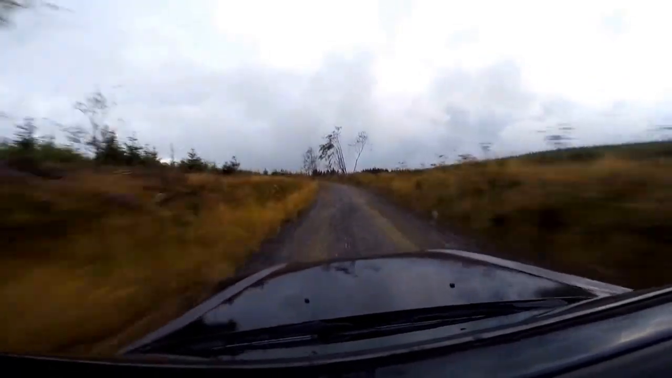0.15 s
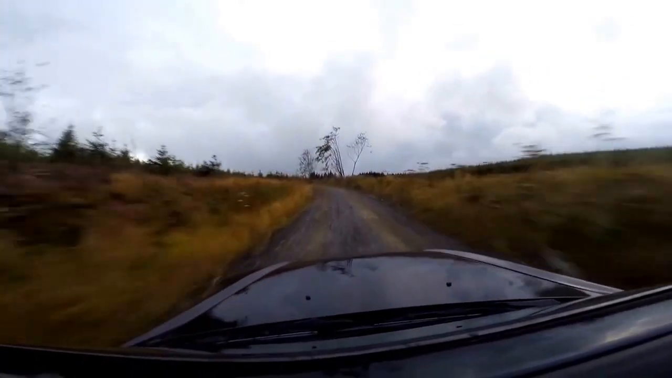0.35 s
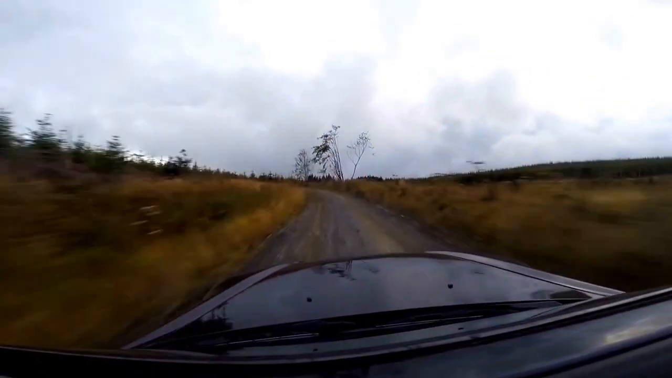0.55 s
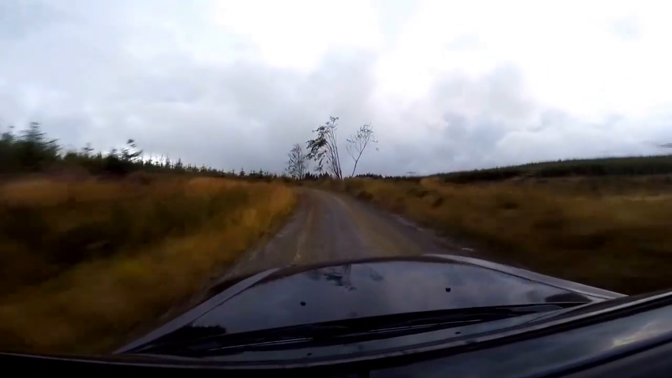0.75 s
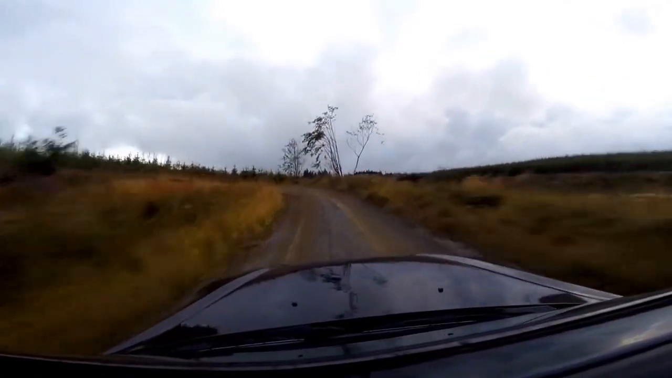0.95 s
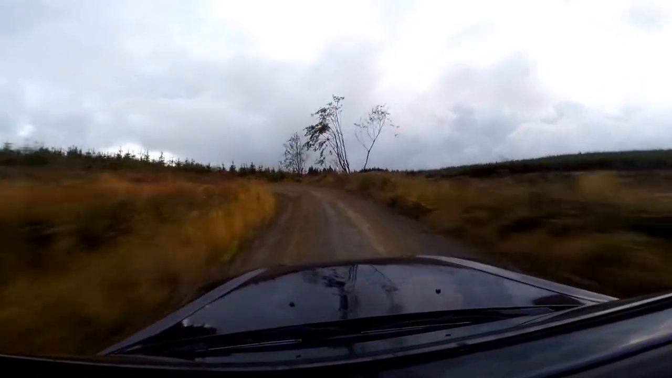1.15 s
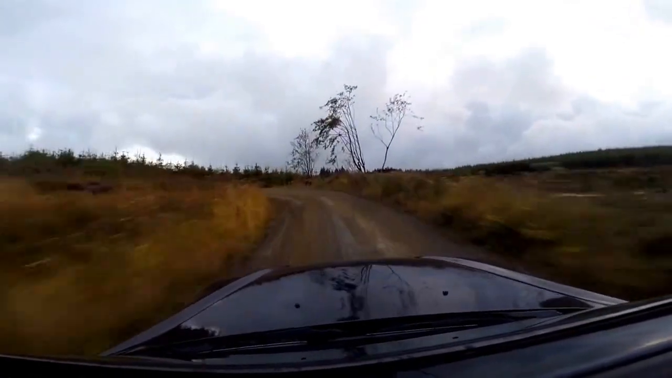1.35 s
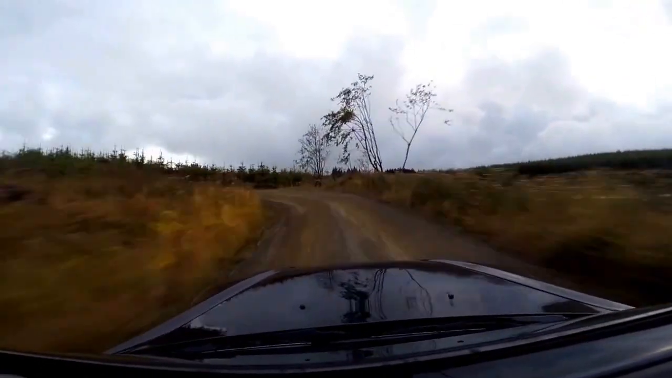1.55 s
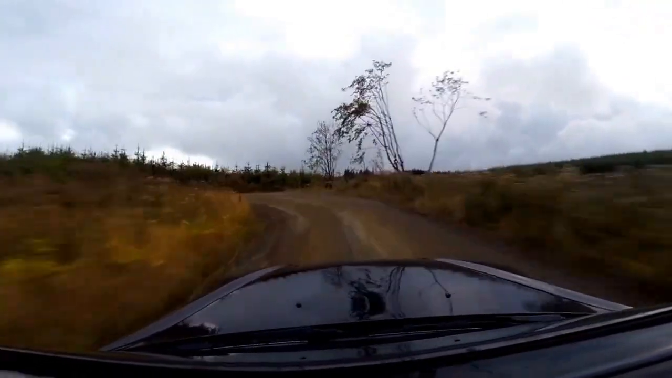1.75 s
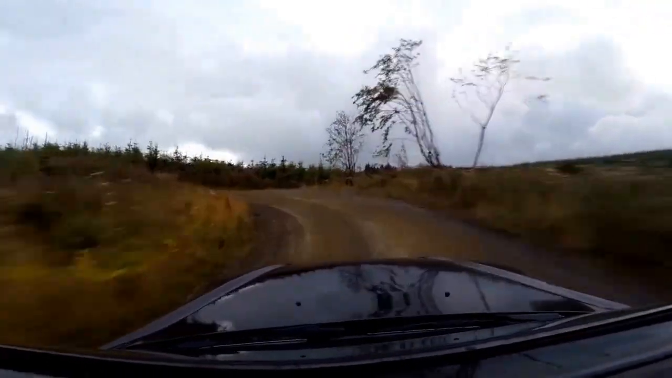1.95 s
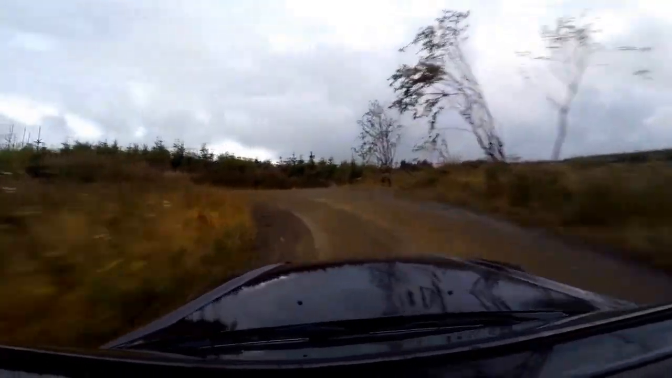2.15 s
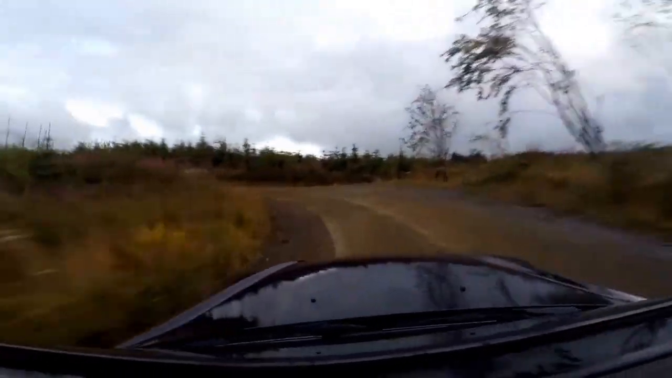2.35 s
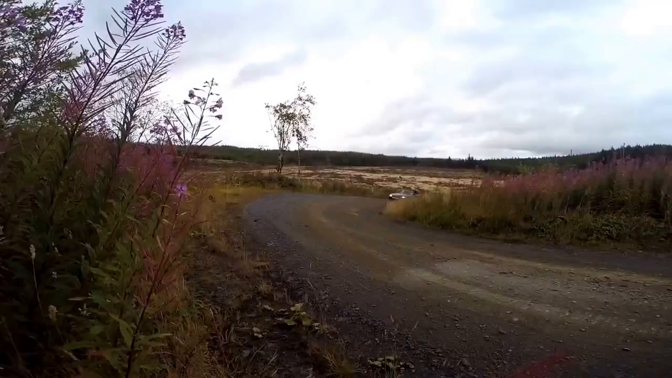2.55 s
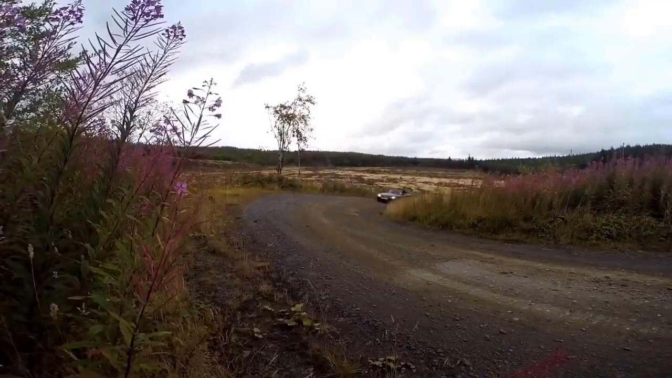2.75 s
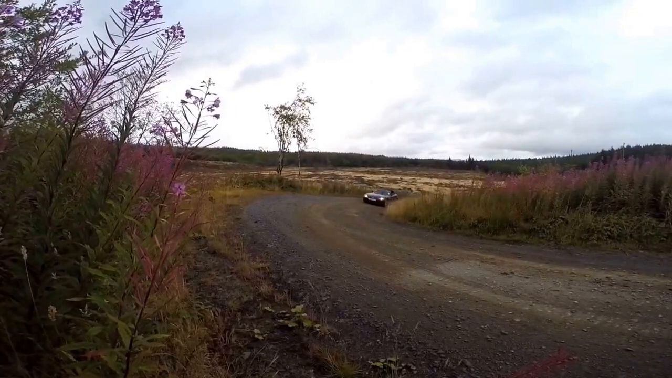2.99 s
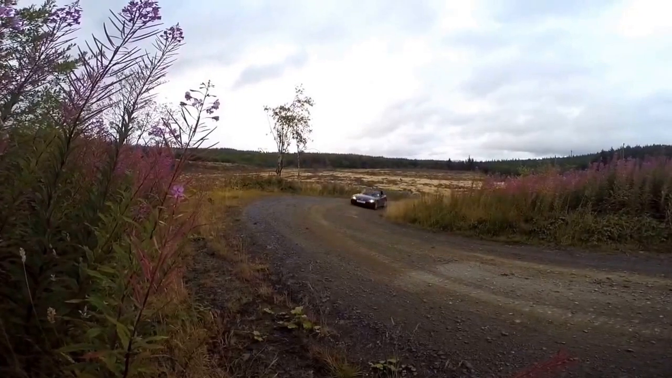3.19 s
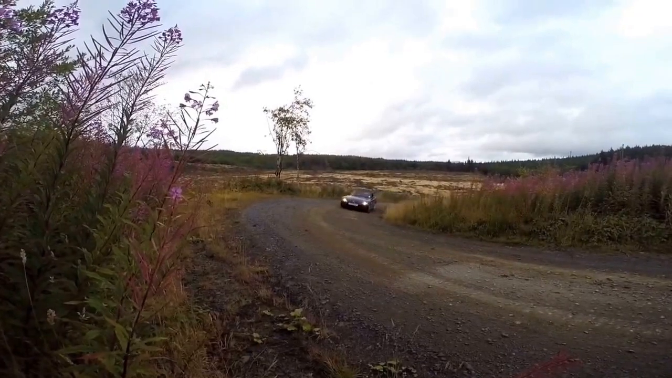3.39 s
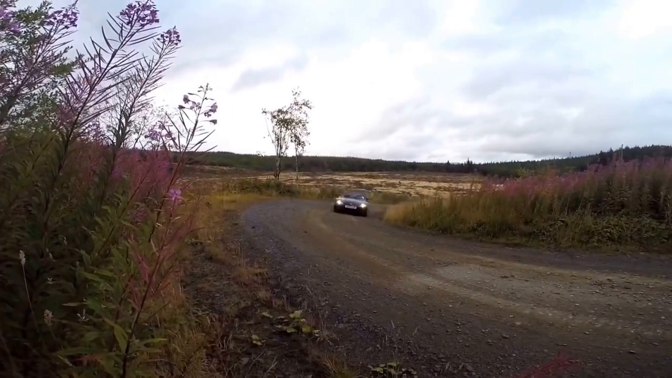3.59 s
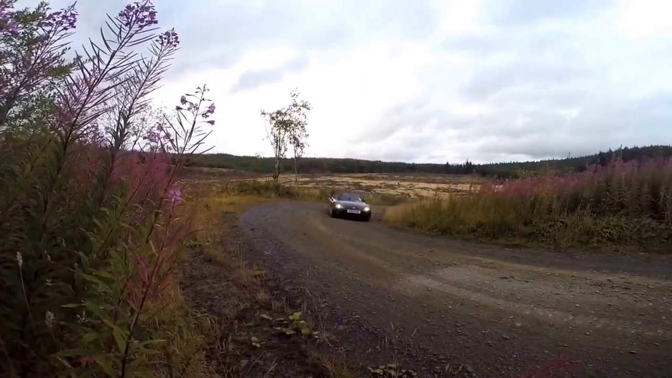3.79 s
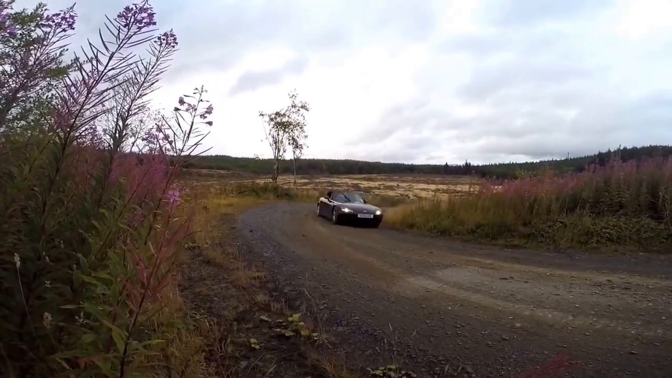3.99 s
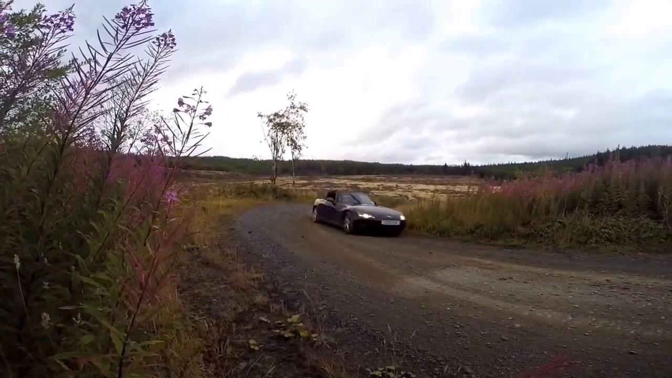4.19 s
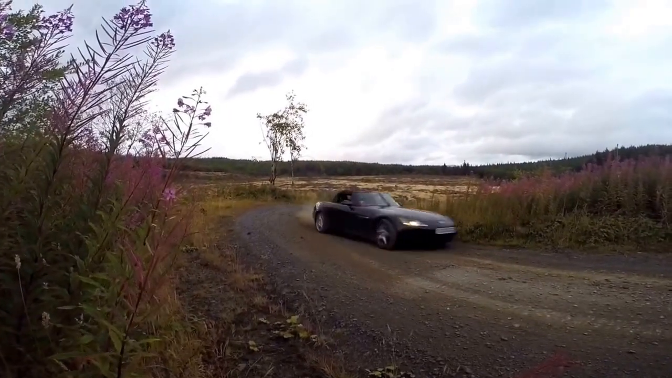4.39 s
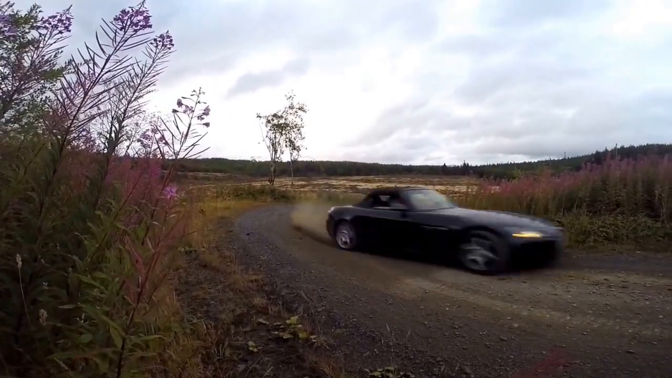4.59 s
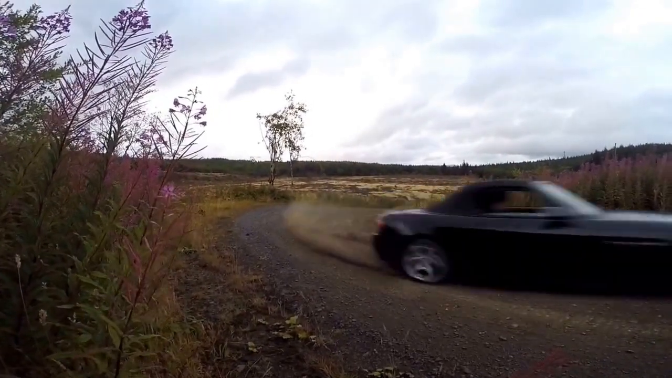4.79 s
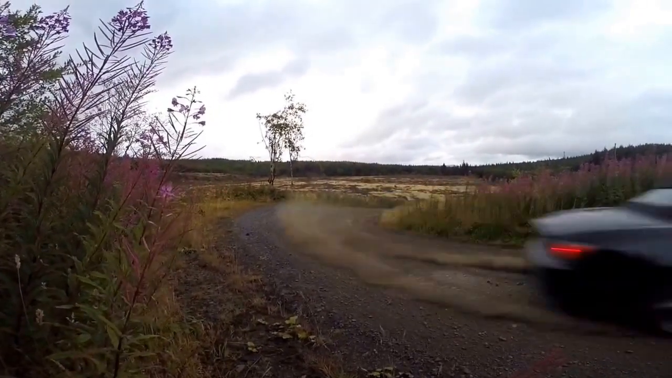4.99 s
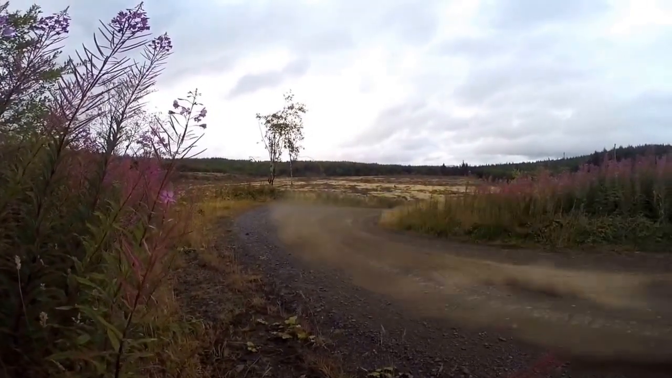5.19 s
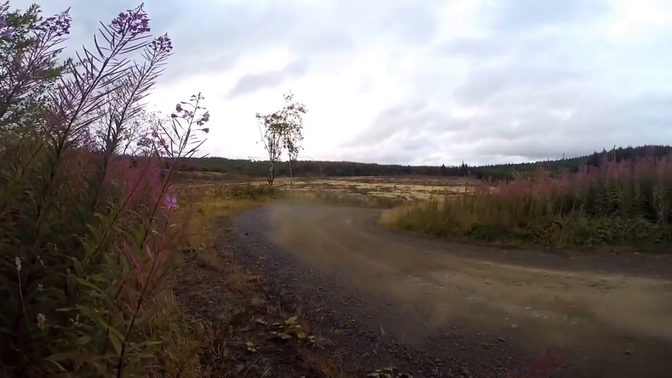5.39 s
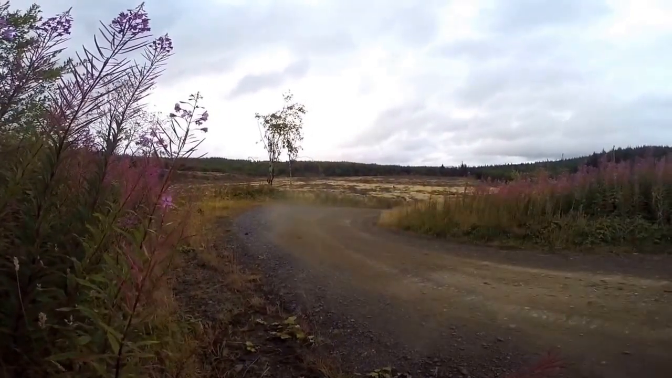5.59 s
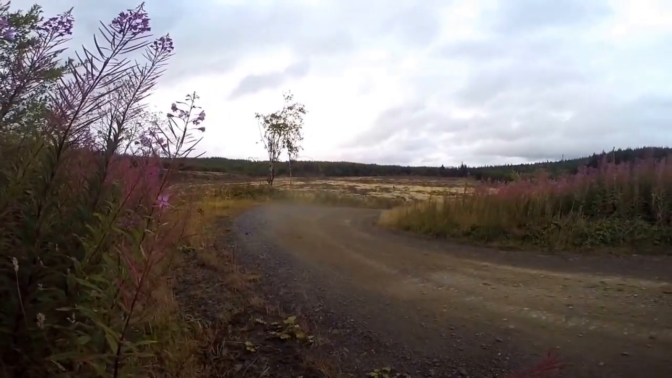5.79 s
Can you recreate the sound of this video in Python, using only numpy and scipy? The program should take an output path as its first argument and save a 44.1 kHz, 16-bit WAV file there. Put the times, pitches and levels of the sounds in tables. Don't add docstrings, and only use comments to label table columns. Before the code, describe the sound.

Thumping low wind roar, a sharp stone hit, then a cut: a four-cylinder car approaches, skids by loudly and leaves pattering grit.

```python
import sys
import numpy as np
from scipy import signal
from scipy.fft import rfft, irfft, next_fast_len
from scipy.io import wavfile
from scipy.ndimage import uniform_filter1d

SR = 44100
rng = np.random.default_rng(int(sys.argv[2]) if len(sys.argv) > 2 else 0)


def bounce(signal):
    frames = np.transpose(np.atleast_2d(signal))
    limited = np.clip(frames, -1, 1)
    pcm = np.round(limited * 32767).astype(np.int16)
    wavfile.write(sys.argv[1], SR, pcm)


def boost_factor(decibels):
    exponent = np.asarray(decibels, float) / 20
    return 10 ** exponent


N = 257528
T = np.arange(N) / SR

# [t/s, level/dB]
GUST = [(0.0, 1.5), (0.3, 1.5), (0.64, 0.5), (0.7, 3), (0.74, -0.5), (1.03, 1.5), (1.4, -1.5), (1.44, -3.5),
        (1.51, 1.5), (1.62, -1), (1.85, -0.5), (2.08, 1.5), (2.25, -1.5), (2.46, -0.5), (2.53, -8)]
# [mean level/dB, share of the gust swing, change once braking/dB]
WIND_LAYERS = [(-17, 1.1, 1.5), (-17.5, 1.22, -6.5), (-29, 1.02, 2.5), (-50.5, 1.17, 1)]
# [low f/Hz, high f/Hz]
WIND_BANDS = [(20, 140), (140, 500), (500, 3500), (4000, 15000)]
# [f/Hz, level per Hz/dB]
WIND_COLOUR = [(8.8, -26), (15, -7.5), (64, -2), (108, -2.5), (198, -3.5), (474, -16), (564, -18.5),
               (1040, -25), (1350, -35), (3220, -43.5), (4300, -55), (6450, -48.5), (8140, -57.5),
               (13700, -77.5), (15400, -93)]
# [t/s, peak level/dB, brightness/dB]
SLAPS = [(0.048, -20, 0), (0.1, -31, -26), (0.158, -30, -39), (0.332, -18.5, -25), (0.429, -38, -12),
         (0.595, -17, 6), (0.671, -22, -23), (0.702, -22, -38), (0.758, -18, -3), (0.914, -23, -19),
         (0.955, -15.5, -33), (0.983, -17.5, -18), (1.075, -28, -16), (1.17, -18, -31), (1.193, -31, -40),
         (1.215, -23, -25), (1.307, -25, -19), (1.388, -27, -31), (1.65, -28, -27), (1.706, -25, -11),
         (1.744, -19, -26), (1.813, -38, -16), (1.916, -18.5, -15), (1.98, -32, -22), (2.051, -19, -28),
         (2.099, -15.5, -27), (2.374, -28, 12), (2.468, -32, 8)]
# [t/s, peak level/dB, f/Hz]
THUMPS = [(0.014, -5, 107), (0.055, -6, 100), (0.089, -11, 58), (0.15, 0, 122), (0.187, -15, 61),
          (0.227, -5.5, 57), (0.274, -2.9, 74), (0.329, 0, 66), (0.384, -2, 95), (0.431, -13, 70),
          (0.468, -9, 182), (0.512, -2.5, 56.7), (0.553, -3, 88), (0.597, -5.5, 59.4), (0.653, -2, 79.6),
          (0.692, -6, 70), (0.766, -0.5, 96), (0.822, -10, 98), (0.867, -7, 87), (0.958, -1.5, 106),
          (1.03, -4, 55.6), (1.09, 1.5, 104), (1.147, -3, 111), (1.226, 2, 75.5), (1.29, -10.3, 53),
          (1.325, -4, 117), (1.41, 1, 156), (1.448, -4.5, 73), (1.515, -4, 120), (1.584, -5.8, 53.4),
          (1.66, -3, 95), (1.707, -3, 107), (1.774, -1.5, 52), (1.823, -7, 106), (1.859, -3, 112),
          (1.921, -2.5, 66), (1.96, -7, 122), (2.004, -1, 148), (2.039, -2, 126), (2.085, -1, 109),
          (2.13, -1, 107), (2.204, -2.5, 53), (2.245, -3.5, 56), (2.295, -14, 48.4), (2.331, -3, 82.4),
          (2.383, -7, 76.4), (2.434, -3, 87.5), (2.473, -18, 45)]
# [t/s, peak level/dB]
SNAPS = [(0.158, -5.5), (0.703, -6.5), (0.758, -11.5), (0.955, -12), (1.193, -11.5), (1.216, -11.5),
         (1.308, -12.5), (1.388, -11.5), (1.648, -16), (1.706, -8.5), (1.979, -27), (2.051, -16)]
# [t/s, peak level/dB, dullness/dB per octave]
STRIKES = [
    (2.2524, -41, 6),
    (2.261, -19, 15),
    (2.2777, -36, 0),
    (2.3309, -6, 2.5),
]
# [f/Hz, level/dB, t60/s]
HOUSING_MODES = [(2164, -36, 0.018), (2530, -27, 0.022), (3160, -22, 0.0088), (3850, -36, .01), (4740, -15, 0.013),
                 (5200, -19, .012), (5500, -8, 0.0094), (6860, -16, .01), (8000, -10.5, 0.0048), (8560, -7, 0.0087),
                 (10000, -14, 0.0076), (11600, -22, .006), (13500, -32, .004)]

# [t/s, f/Hz]
REVS = [(2.6, 97.6), (2.75, 106.1), (2.84, 119.9), (2.91, 127.4), (3.04, 133.2), (3.37, 143.0),
        (3.5, 136.1), (3.75, 103.2), (3.92, 125.3), (4.05, 137.4), (4.25, 146.9), (4.59, 155.9),
        (4.81, 158.5), (5.06, 152.1), (5.25, 150.3), (5.5, 147.3), (5.7, 143.5), (5.84, 141.0)]
# [start t/s, end t/s, firing tone level at start/dB, at end/dB]
PULLS = [
    (2.778, 3.38, -25.5, -20),
    (3.84, 4.585, -20.5, -13),
    (4.743, 4.845, -25, -21),
    (5.14, 5.898, -17.5, -15.5),
]
# [multiple of firing rate, level re firing tone coming/dB, leaving/dB, change far off/dB]
ORDERS_DB = [(.5, -18, -22, -4), (.75, -18, -21, 0), (1.25, -23, -26, 0), (1.75, -19, -27, 0),
             (2, -19, -14, -9), (2.5, -21, -24, -6), (3, -16, -19, -5), (4, -28, -30, 0),
             (4.25, -23, -34, 0), (4.5, -28, -34, 0), (4.75, -25, -30, 0), (5, -27, -23, 0),
             (6, -27, -19, 4), (6.25, -28, -20, 0), (8, -27, -27, 0)]
# [f/Hz, width/Hz, lift/dB]
PIPES = [(272, 30, 6), (605, 35, 11)]
BEAT_DEPTHS = [(.25, .14), (.5, .1), (1, .2)]
# [t/s, roar level/dB, spray of small stones re roar/dB]
SLIDE = [(2.54, -43.5, -17), (2.81, -36.5, -18.5), (2.97, -34, -18.5), (3.3, -27, -25), (3.77, -25, -26.5),
         (3.95, -22, -25), (4.27, -14.5, -20), (4.46, -15, -19.5), (4.8, -10, -16.5), (5.21, -18.5, -16.5),
         (5.45, -23, -13.5), (5.74, -30, -6.5), (5.84, -25, -15)]
# [level at a -20 dB roar/dB, share of roar swing, share of spray swing,
# change once past/dB]
SLIDE_LAYERS = [(-23.5, 0.69, 0.099, -5.5), (-21, 1, 0.057, 1), (-40, 0.89, 1, -0.5),
                (-49, 0.79, 0.25, 5.5)]
# [low f/Hz, high f/Hz]
SLIDE_BANDS = [(180, 450), (450, 1750), (1900, 3600), (4200, 15000)]
# [f/Hz, level per Hz/dB]
SLIDE_COLOUR = [(60, 1.5), (150, -4.5), (700, -0.5), (1050, -2.5), (1500, -19.5), (2450, -29.5),
                (2800, -34), (3300, -33.5), (3900, -38.5), (4400, -39.5), (5400, -41.5), (6500, -44),
                (7500, -51), (11500, -58.5), (13500, -63), (15500, -72)]
# [t/s, peak level/dB, f/Hz]
CRUNCHES = [(2.955, -13, 610), (3.362, -20, 413), (3.362, -26, 2800), (3.747, -19.5, 1930),
            (3.744, -52, 593), (4.209, -11, 436), (4.286, 4, 434), (4.3, 0, 890), (4.326, 3.5, 740),
            (4.399, -1, 454), (4.443, -0.5, 980), (4.584, 2.5, 815), (4.639, 3, 610), (4.719, -15, 604),
            (4.799, -1, 471), (4.819, -8, 580), (4.852, -7, 860), (4.933, 3, 796), (4.963, 1, 855),
            (5.06, 6.5, 700), (5.065, -6, 510), (5.179, -6, 426), (5.258, -1, 715), (5.299, -7, 800),
            (5.407, -6, 810), (5.574, -5, 840), (5.646, -4, 910), (5.77, -7.5, 920), (4.003, -4, 794),
            (4.026, -5, 770), (4.165, -6, 654), (4.188, 2, 790), (4.26, -4, 790), (4.495, -4, 574),
            (4.525, -6, 706), (4.556, -12, 700), (4.68, 0, 750), (4.726, -6, 690), (4.755, -9, 760),
            (4.784, 2, 885), (4.816, 3.5, 820), (4.848, -13, 600), (4.898, -5, 624), (4.995, -3, 630),
            (5.104, -5, 596), (5.148, 2, 720)]
# [t/s, level/dB]
PUFFS = [(2.83, -36), (3.3, -39), (3.58, -27), (3.81, -25), (4.0, -31), (4.15, -35), (4.29, -29),
         (4.62, -25), (4.85, -44), (5.1, -31), (5.36, -48), (5.84, -46)]
# [f/Hz, rms level/dB]
WHINE = [(5846, -76), (7919, -85), (8780, -84), (11687, -92), (11719, -81), (14626, -85)]
# [t/s, grains per s, level/dB]
PATTER = [(2.6, 23, -67), (4.0, 60, -60), (4.7, 120, -58), (5.3, 180, -51), (5.84, 160, -41)]
# [t/s, peak
# level/dB, f/Hz, top re peak/dB, spread/ms]
STONES = [(2.797, -53, 8200, -40, 8), (2.877, -40, 5400, -32, 7.7), (3.022, -40, 4730, -32, 13),
          (3.362, -40, 5300, -39, 6), (3.392, -37, 5000, -30, 6), (3.53, -50, 8500, -30, 8),
          (3.61, -50, 8300, -30, 6), (3.69, -50, 8500, -30, 8), (3.7445, -40, 5100, -30, 4),
          (3.9293, -37, 4800, -15, 2), (3.954, -41, 8500, -18, 4), (4.027, -31, 5600, -22, 2),
          (4.055, -42, 5500, -18, 6), (4.0867, -44, 4300, -18, 2), (4.1205, -23.5, 5030, -14, 2.4),
          (4.208, -34, 4900, -28, 2), (4.2568, -34, 4600, -26, 2), (4.3865, -33, 4940, -30, 2),
          (4.5102, -24, 4800, -38, 2.4), (4.5576, -30, 4250, -24, 1.5), (4.583, -26, 4730, -23, 7),
          (4.6277, -29, 5000, -28, 5.5), (4.721, -27, 5500, -16, 5.8), (4.731, -21, 5600, -21, 6),
          (4.775, -30, 4500, -23, 5), (4.8895, -30, 5500, -20, 2.3), (4.8965, -26.5, 6450, -32, 2),
          (4.915, -35, 6000, -15, 6), (5.006, -36, 5630, -9, 7.7), (5.0355, -29.5, 6100, -15, 6),
          (5.048, -33, 6500, -16, 5), (5.2096, -30, 5400, -17, 4), (5.2465, -29, 5400, -18.5, 4),
          (5.4037, -30.5, 5600, -20, 3), (5.4411, -32, 4200, -28, 2), (5.4665, -35, 6160, -17, 2),
               (5.487, -33, 6200, -22, 3.1), (5.533, -36, 6200, -16, 2.8), (5.555, -36, 7200, -24, 2),
               (5.57, -24, 6860, -29, 1.1), (5.5786, -26, 6500, -16, 2), (5.603, -34, 7500, -26, 2),
               (5.6177, -22, 6030, -13, 1.8), (5.635, -24, 5760, -28, 2), (5.6668, -19.5, 5200, -21, 4.1),
               (5.6938, -27, 5400, -20, 2), (5.7329, -28, 5800, -24, 2), (5.7534, -25.5, 7150, -15, 2.3),
               (5.7778, -33, 8000, -11, 1.8), (5.7958, -32, 6450, -24, 2), (5.82, -41, 7000, -12, 3)]


def in_time(rows):
    s, *columns = np.transpose(rows)
    return [np.interp(T, s, c) for c in columns]


def ramp(start_s, end_s):
    return np.interp(T, [start_s, end_s], [0, 1])


def drift(rate):
    r = np.exp(-32 * np.pi * rate / SR)
    slow = signal.lfilter([1], [1, -2 * r, r * r], rng.standard_normal(N // 16 + 3002))[3000:]
    return np.interp(np.arange(N) / 16, np.arange(len(slow)), slow / slow.std())


def clicks_at(times, heights):
    clicks = np.zeros(N)
    clicks[(np.asarray(times) * SR).astype(int)] = heights
    return clicks


def ring(clicks, hz, t60):
    r, w = boost_factor(-60 / (t60 * SR)), 2 * np.pi * hz / SR
    return signal.lfilter([0, np.sin(w)], [1, -2 * r * np.cos(w), r * r], clicks + 1e-18)


def band(x, low_hz, high_hz):
    sos = signal.butter(2, [low_hz, min(high_hz, .45 * SR)], "band", fs=SR, output="sos")
    return signal.sosfilt(sos, x)


def bursts(times, levels_db, decay_s):
    clicks = np.zeros(N)
    np.add.at(clicks, (np.asarray(times) * SR).astype(int), boost_factor(levels_db))
    return signal.lfilter([1], [1, -np.exp(-1 / (decay_s * SR))], clicks + 1e-18)


def turbulent(source, colour, bands, levels_db, shared_db, own_db, lumps):
    size = next_fast_len(N)
    octave = np.log2(np.maximum(np.arange(size // 2 + 1) * SR / size, 1))
    hz = 2 ** octave
    colour_hz, colour_db = np.transpose(colour)
    shape_db = np.interp(octave, np.log2(colour_hz), colour_db, left=-60, right=-130)
    spectrum = rfft(source, size) * boost_factor(shape_db)
    power = np.abs(spectrum) ** 2 * 2 / size / N
    gains = np.array([db - 10 * np.log10(power[(hz > low) & (hz < high)].sum())
                      for db, (low, high) in zip(levels_db, bands)])
    flats = np.log2(np.ravel([(low * 1.2, high / 1.2) for low, high in bands]))
    out = np.zeros(N)
    for centre in np.arange(3.5, 14.6, .5):
        part = irfft(spectrum * np.maximum(1 - 2 * np.abs(octave - centre), 0), size)[:N]
        weights = np.array([np.interp(centre, flats, row) for row in np.eye(4).repeat(2, axis=1)])
        share = np.interp(centre, [6, 10, 13], shared_db)
        flicker_db = own_db * drift(min(2 ** centre / 12, 25))
        out += part * boost_factor(weights @ gains + share * lumps + flicker_db)
    return out


def gusts():
    gust_db, = in_time(GUST)
    braking = ramp(1.9, 2.5)
    return [db + share * gust_db + change_db * braking for db, share, change_db in WIND_LAYERS]


def lulls():
    depth, lead_s, length_s = 0.22, 0.0053, 0.0032
    corners_s = length_s * np.array([-2, 0, 1]) - lead_s
    sag = sum(np.interp(T, s + corners_s, [0, 1, 0]) for s, _ in SNAPS)
    return 1 - depth * np.minimum(sag, 1)


def wind():
    lumps = 0.14 * drift(11) + 1.16 * drift(46.6)
    levels_db = gusts()
    flow = turbulent(rng.standard_normal(N), WIND_COLOUR, WIND_BANDS, levels_db, [1.5, 1.5, 1.5], 1.0, lumps)

    s, peak_db, bright_db = np.transpose(SLAPS)
    clicks = clicks_at(s, boost_factor(peak_db) * rng.choice([-1, 1], len(s)))
    push = 1.6 * ring(clicks, 170, .03) + ring(clicks, 520, .018)
    puff = 4 * rng.standard_normal(N) * bursts(s, peak_db - 7, .007)
    dull = band(push + puff, 80, 1300)
    hiss = 2 * rng.standard_normal(N) * bursts(s, peak_db + bright_db - 17.5, .002)
    bright = band(band(hiss, 1500, 7000), 1200, 7500)

    knock_db = 3 * drift(15) + 3 * rng.exponential(1, N).clip(0, 3)
    knocks = (rng.random(N) < 900 / SR) * boost_factor(knock_db)
    loose_part = ring(knocks, 5000, .008) + .8 * ring(knocks, 10000, .008)
    rattle = boost_factor(levels_db[3] - 17) * band(loose_part, 5000, 8000)
    return lulls() * flow + dull + bright + rattle


def thumps():
    t, out = np.arange(-2500, 2500) / SR, np.zeros(N + 5000)
    for s, peak_db, hz in THUMPS:
        at = int(s * SR)
        swing = np.cos(2 * np.pi * (hz * t + rng.random()))
        out[at:at + 5000] += boost_factor(peak_db - 4) * swing * np.exp(-(t * hz / 0.82) ** 2)
    return out[2500:N + 2500]


def snaps():
    width_s, delay_s, gain_db = .00045, .0015, 7
    s, peak_db = np.transpose(SNAPS)
    clicks = clicks_at(s + delay_s, boost_factor(peak_db + gain_db))
    u = np.arange(-150, 151) / SR / width_s
    pulse = 0.26 * np.exp(-u ** 2 / 18) - 1.41 * np.exp(-u ** 2 / 2)
    return np.convolve(clicks, pulse, "same")


def spray():
    start_s, level_db, decay_s = 2.178, -41, .014
    return 3 * band(rng.standard_normal(N) * bursts([start_s], level_db, decay_s), 2500, 8000)


def strikes():
    s, peak_db, dull_db = np.transpose(STRIKES)
    out = np.zeros(N)
    for hz, level_db, t60 in HOUSING_MODES:
        chance_db = 0.83 * rng.standard_normal(len(s))
        hit_db = peak_db + level_db + 1 - dull_db * np.log2(hz / 5000) + chance_db
        out += ring(clicks_at(s, boost_factor(hit_db)), hz, t60)
    return out


def whine():
    tones = sum(boost_factor(db + 5 + 1.2 * drift(20)) * np.sin(2 * np.pi * hz * T + .6 * drift(9)) for hz, db in WHINE)
    white = rng.standard_normal(N)
    return tones + boost_factor(-67.5) * (band(white, 4300, 13000) + 1.3 * band(white, 7700, 9200))


def breeze():
    level_db, puff_s = -37.5, 0.08
    low = band(band(rng.standard_normal(N), 27, 110), 7.2, 110)
    level = boost_factor(level_db) + sum(boost_factor(db) * np.exp(-((T - s) / puff_s) ** 2) for s, db in PUFFS)
    return low / low.std() * level * boost_factor(drift(5.6))


def firing_tone_db():
    open_s, shut_s = 0.082, 0.064
    coast_db, roar_share, flutter_db = -24, .5, 5
    roar_db = in_time(SLIDE)[0]
    level = boost_factor(coast_db + roar_share * (roar_db - roar_db.max()) + flutter_db * drift(15))
    for start, end, first_db, last_db in PULLS:
        opened = np.clip(np.minimum((T - start) / open_s, (end - T) / shut_s), 0, 1)
        pull = boost_factor(np.interp(T, [start, end], [first_db, last_db]))
        level = level + opened * (pull - level)
    return 20 * np.log10(level)


def engine():
    firing_hz, tone_db = in_time(REVS)[0], firing_tone_db()
    load_db = uniform_filter1d(tone_db, size=8000)
    behind = ramp(4.44, 4.6)
    far = T > 5.55
    turn = 2 * np.pi * np.cumsum(firing_hz * (1 + 0.002 * drift(14))) / SR
    out = boost_factor(tone_db + 1.4 * drift(39)) * np.sin(turn)
    for multiple, front_db, rear_db, far_db in ORDERS_DB:
        order_hz = multiple * firing_hz
        pipes_db = sum(lift_db * np.exp(-((order_hz - hz) / width) ** 2) for hz, width, lift_db in PIPES)
        level_db = load_db + front_db + (rear_db - front_db) * behind + far_db * far
        level_db += (1 - behind) * pipes_db
        out += boost_factor(level_db + 1.5 * drift(6)) * np.sin(multiple * turn + .25 * drift(5))
    return np.sqrt(2) * out


def exhaust_beat():
    turn = 2 * np.pi * np.cumsum(in_time(REVS)[0]) / SR
    return 1 + sum(depth * np.cos(multiple * turn) for multiple, depth in BEAT_DEPTHS)


def sliding():
    roar_db, spray_db = in_time(SLIDE)
    leaving = ramp(5.33, 5.63)
    pasts = [T > 5.2, leaving, leaving, leaving]
    return [db + roar_share * (roar_db + 20) + spray_share * (spray_db + 19.5) + past_db * past
            for (db, roar_share, spray_share, past_db), past in zip(SLIDE_LAYERS, pasts)]


def slide():
    sizes = boost_factor(1.83 * np.minimum(rng.exponential(1, N), 5)) * rng.choice([-1, 1], N)
    crunch = sizes * (rng.random(N) < 2500 / SR)
    source = crunch / crunch.std() + 1.02 * rng.standard_normal(N)
    lumps = 0.092 * drift(19) + 0.28 * drift(23)
    return turbulent(source, SLIDE_COLOUR, SLIDE_BANDS, sliding(), [.8, 2.5, 1.5], 0.43, lumps)


def patter():
    per_s, level_db = in_time(PATTER)
    grains = (rng.random(N) < per_s / SR) * boost_factor(level_db + 3.7 * rng.exponential(1, N).clip(0, 3))
    dealt = rng.integers(0, 5, N)
    pitches_hz = np.geomspace(4900, 9500, num=5)
    rings = sum(ring(grains * (dealt == k), hz, 18 / hz) for k, hz in enumerate(pitches_hz))
    return band(rings, 4500, 12000)


def stones():
    out, t = np.zeros(N + 2000), np.arange(2000) / SR
    for s, peak_db, hz, top_db, spread_ms in STONES:
        white, at, spread = rng.standard_normal((3, 2000)), int(s * SR), spread_ms / 1000
        shape = 2.06 * np.exp(-t / spread) * (1 - np.exp(-3 * t / spread))
        tail = 0.14 * np.exp(-t / 0.028)
        tick = np.sin(2 * np.pi * hz * t) * np.exp(-t / 0.0015) * min(0.0014 / spread, 1)
        crack = 1.15 * band(white[0] * (shape + tail), 0.81 * hz, 1.24 * hz)
        top = 2.3 * boost_factor(top_db) * band(white[1] * shape, 7800, 13300)
        knock = boost_factor(1) * band(white[2] * shape, 1800, 4000)
        out[at:at + 2000] += boost_factor(peak_db - 3) * (tick + crack + top + knock)
    return out[:N]


def crunches():
    out, t = np.zeros(N + 2000), np.arange(2000) / SR
    for s, peak_db, hz in CRUNCHES:
        at = int(s * SR)
        noise = rng.standard_normal(2000) * np.exp(-t / .01)
        burst = band(band(noise, .75 * hz, 1.3 * hz), .6 * hz, 1.5 * hz)
        out[at:at + 2000] += boost_factor(peak_db - 8) * burst / np.abs(burst).max()
    return out[:N]


def housing_notch(x):
    notch_hz, width_hz, depth = 3800, 330, 0.52
    b, a = signal.iirpeak(notch_hz, notch_hz / width_hz, fs=SR)
    return x - depth * signal.lfilter(b, a, x)


def scene():
    onboard = wind() + thumps() + snaps() + spray() + strikes()
    roadside = whine() + breeze() + engine() + exhaust_beat() * (slide() + crunches()) + patter() + stones()
    fade_out = np.interp(T, [2.5, 2.5335], [1, .25], right=0)
    fade_in = ramp(2.544, 2.6)
    return (fade_out * onboard + fade_in * housing_notch(roadside))[None]


def band_limit(x):
    return signal.sosfilt(signal.butter(12, 15560, fs=SR, output="sos"), x)


def record(dry):
    rounded = dry / (1 + np.abs(dry) ** 8) ** (1 / 8)
    top_cut = signal.cheby2(10, 50, 15900, fs=SR, output="sos")
    return band_limit(signal.sosfilt(top_cut, rounded))


dry = scene()
out = record(dry)
bounce(out)
```